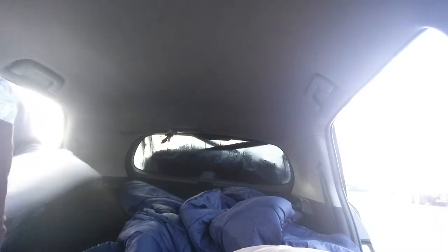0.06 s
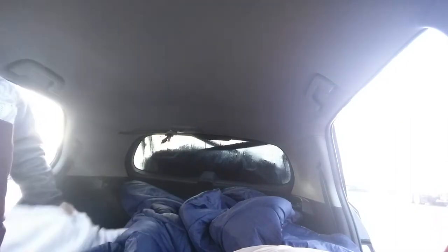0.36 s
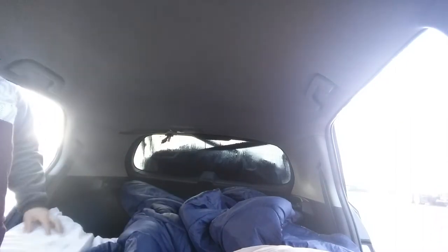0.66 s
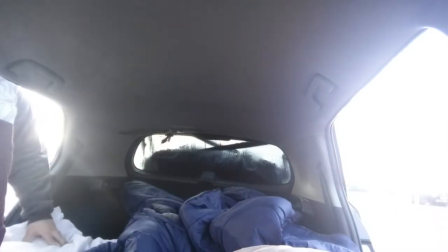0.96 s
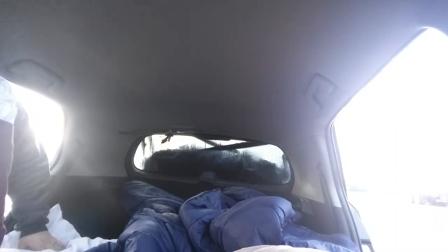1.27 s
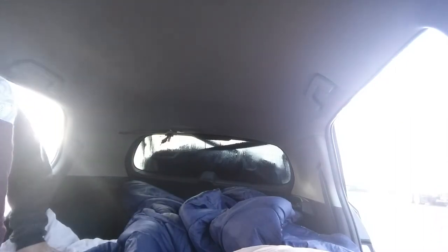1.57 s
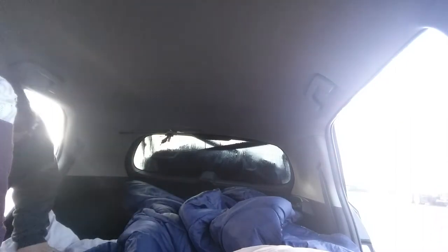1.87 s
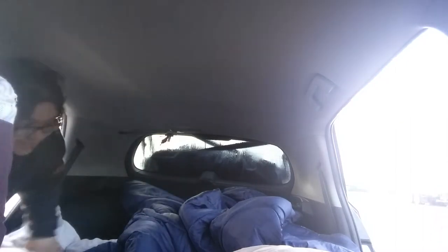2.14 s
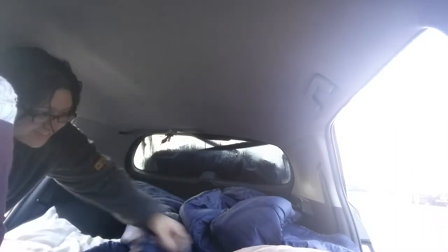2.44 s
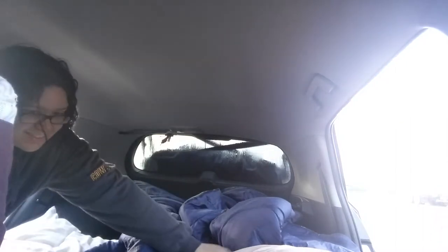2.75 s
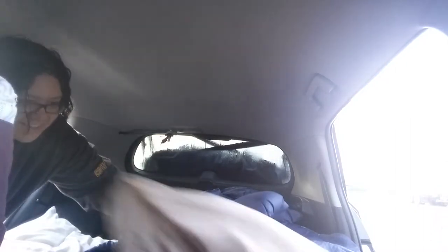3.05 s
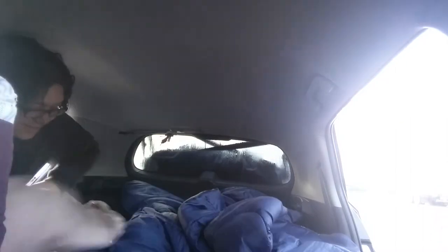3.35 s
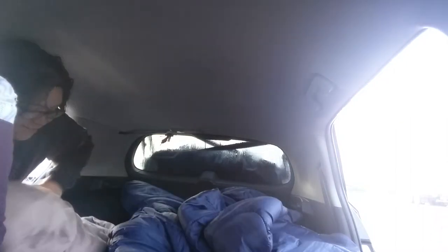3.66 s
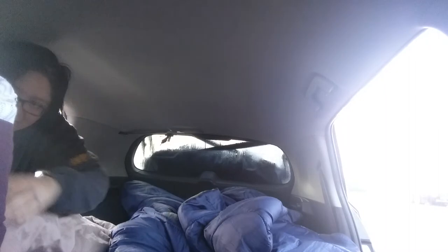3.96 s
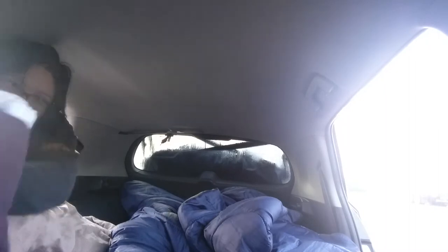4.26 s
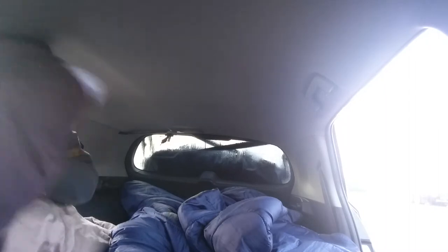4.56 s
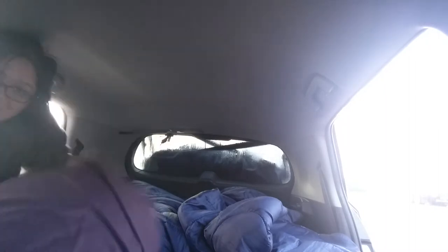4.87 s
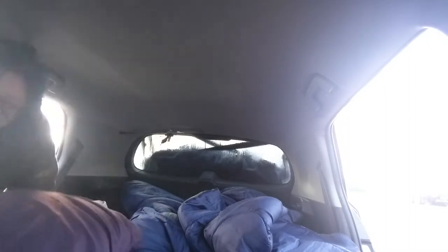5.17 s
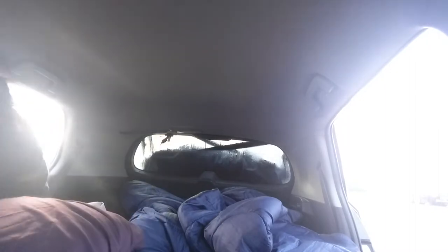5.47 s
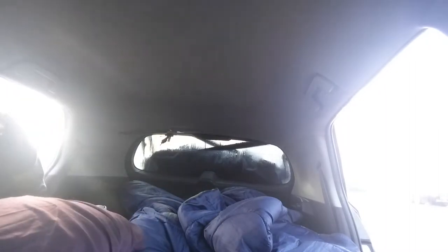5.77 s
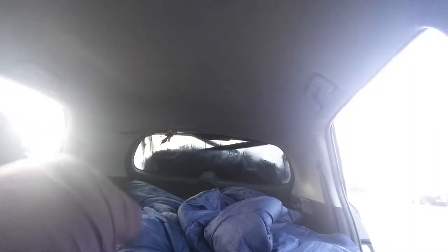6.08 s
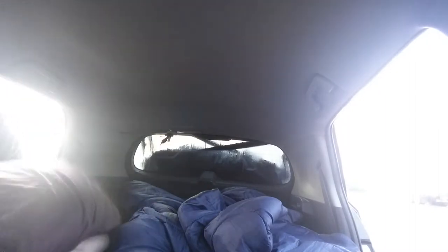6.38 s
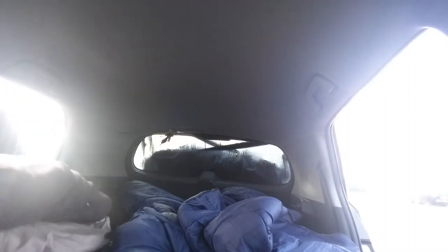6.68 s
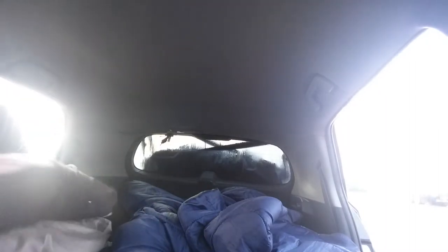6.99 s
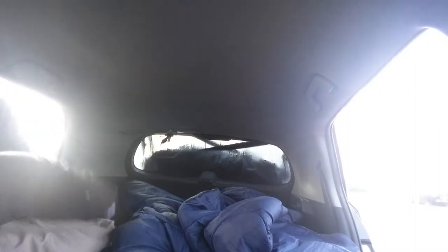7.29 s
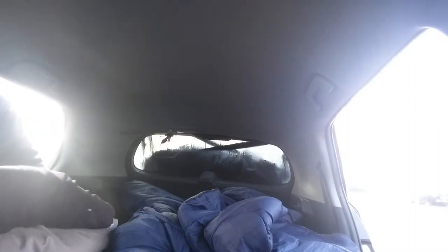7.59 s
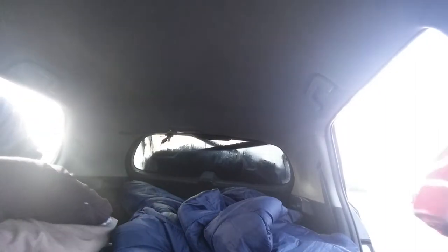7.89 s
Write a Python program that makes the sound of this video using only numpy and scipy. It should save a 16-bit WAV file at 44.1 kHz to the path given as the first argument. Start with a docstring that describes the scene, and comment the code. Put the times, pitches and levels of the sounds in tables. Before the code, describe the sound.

Inside a parked car, the engine idles with a steady low hum and rumble. Someone drags blankets with a dull rub and smooths them with a palm, their shifting weight booming softly on the floor. Nylon sleeping bags swish about three seconds in, then a blanket flops down with a thump. More scuffs, tiny crinkles and bumps follow, mostly to the left of the stereo microphone.

```python
"""A steady idling hum and rumble fill a parked car while bedding is pulled about in the back.
Blankets drag with a dull rub, a palm wipes over them, and shifting weight booms on the load floor.
Nylon sleeping bags swish, scuff and crinkle as they slide and buckle; one blanket flops down with a thump.
The hum is tones locked to the engine's turning; the cloth is friction noise coloured by the cabin.
Most of the movement is to the left of a two-port microphone."""
import sys
import numpy as np
from scipy import signal
from scipy.fft import rfft, irfft, next_fast_len
from scipy.io import wavfile

SR = 44100
rng = np.random.default_rng(int(sys.argv[2]) if len(sys.argv) > 2 else 0)


def dump(signal):
    """Clip the signal to [-1, 1] and save it as 16-bit WAV at the path in sys.argv[1]."""
    limited = np.clip(np.atleast_2d(signal).T, -1, 1)
    pcm = np.round(limited * 32767).astype(np.int16)
    wavfile.write(sys.argv[1], SR, pcm)


N = 354123
TIME = np.arange(N) / SR
SIZE = next_fast_len(N)
FREQS = np.maximum(np.fft.rfftfreq(SIZE, 1 / SR), 1)
PORT_LAG_S = 0.00058   # the right port hears later

# how much the sleeping bags stir: t/s, level/dB
BAG_STIR = [(0, -71), (1.1, -88), (2.05, -78.5), (2.85, -77.5), (3.4, -71), (4.15, -77.5), (4.55, -72),
            (4.95, -77), (6.2, -73), (6.8, -75), (7.03, -73.5), (7.65, -74.5), (8.03, -73.5)]
# colour of the cabin's boom: f/Hz, left/dB, right/dB
CABIN_BOOM = [(85.6, -2.5, -6), (116, -1.5, -2), (144, 1, 0.5), (202, -12, -10), (281, -19, -20)]


def from_db(db):
    """Decibels to gain."""
    return 10 ** (np.asarray(db) / 20)


def rms_one(x):
    """Scale to unit power."""
    return x / np.sqrt(np.mean(x ** 2) + 1e-20)


def in_time(rows):
    """A curve read at every sample."""
    return np.interp(TIME, *np.transpose(rows))


def over_pitch(rows):
    """Each level column of a table read at every frequency."""
    hz, *columns = np.transpose(rows)
    return np.array([np.interp(np.log(FREQS), np.log(hz), c) for c in columns])


def drift(rate_hz):
    """A slow random wobble of unit power."""
    spectrum = rfft(rng.standard_normal(SIZE)) / (1 + (FREQS / rate_hz) ** 2)
    return rms_one(irfft(spectrum, SIZE)[:N])


def stroke(peak_s, rise_s, fall_s):
    """The bell-shaped envelope of a movement that speeds up, then stops."""
    return np.exp(-.5 * ((TIME - peak_s) / np.where(TIME < peak_s, rise_s, fall_s)) ** 2)


def strokes(rows):
    """The envelope of a series of movements."""
    return sum(from_db(db) * stroke(s, rise, fall) for s, rise, fall, db in rows)


def effort(rows, rise_share, rest_db):
    """Overlapping movements add in power over a resting level; each builds for a share of its length."""
    power = sum((from_db(db) * stroke(s, rise_share * length, (1 - rise_share) * length)) ** 2
                for s, length, db in rows)
    return np.sqrt(from_db(rest_db) ** 2 + power)


def at_ports(drive, colour, skirt_db_per_octave=30):
    """Two noises become a coloured stereo field that rings in the cabin and reaches the left port first."""
    # diffuse sound that differs between the ports, against the shared sound: f/Hz, level/dB
    diffuse = [(30, -23), (90, -19), (180, -12.5), (260, -9), (520, -9), (800, -5.5), (1100, -7.5),
               (1600, 0), (3000, 0)]
    # air resonances of the cabin: f/Hz, width/Hz, gain/dB
    air_modes = [(318.6, 4.5, 4.5), (392, 5.5, 1.5), (457, 83, -6), (482, 29, 4), (930, 24, 0)]
    side_gain = from_db(over_pitch(diffuse)[0])
    mid, side = rfft(drive, SIZE)
    ports = (mid + side_gain * side * [[1], [-1]]) / np.hypot(1, side_gain)
    ports[1] *= np.exp(-2j * np.pi * FREQS * PORT_LAG_S)
    cabin_db = sum(db / (1 + (2 * (FREQS - hz) / width) ** 2) for hz, width, db in air_modes)
    # the colour rolls off beyond either end of its table
    octaves_beyond = np.abs(np.log2(FREQS / np.clip(FREQS, colour[0][0], colour[-1][0])))
    eq_db = over_pitch(colour) + cabin_db - skirt_db_per_octave * octaves_beyond
    return irfft(ports * from_db(eq_db), SIZE)[:, :N]


def steady(colour):
    """Even noise, coloured from a flat 0 dB per Hz."""
    return at_ports(rng.standard_normal((2, N)) * np.sqrt(SR / 2), colour)


def friction(colour, grains_per_s=700, spread_db=3, grain_db=-8):
    """Countless slipping fibres make smooth noise; larger slips are grains. Defaults suit soft cloth."""
    sizes = from_db(spread_db * np.minimum(rng.exponential(1, (2, N)), 5))
    signs = rng.choice([-1, 1], (2, N))
    slips = rng.random((2, N)) < grains_per_s / SR
    grains = from_db(grain_db) * rms_one(sizes * signs * slips)
    return rms_one(at_ports(rng.standard_normal((2, N)) + grains, colour))


def engine(turns_per_s=22.42, wander_turns=0.0028, flutter_db=1.0, pan_right_db=0.35):
    """Tones locked to the slightly uneven turning of the engine, over the rumble of the body shell."""
    # idle tones: multiple of the turning rate, level/dB
    orders = [(1, -63.5), (2, -54.5), (3, -44), (4, -31.5), (5, -47.5), (7, -46), (8, -54), (9, -53.5),
              (19, -59.5)]
    # noise spectrum of the rumble: f/Hz, left/dB, right/dB
    rumble = [(20.3, -70, -69), (37.6, -55.5, -49.5), (60.5, -62.5, -59.5), (80.3, -51.5, -46),
              (112, -58, -52), (165, -54, -57), (205, -67, -63), (297, -67.5, -69.5), (472, -71, -75.5),
              (660, -78, -80), (946, -80, -86), (1574, -97, -105), (2230, -109, -113)]
    port_time = TIME - np.array([[0], [PORT_LAG_S]])
    turns = turns_per_s * port_time + wander_turns * drift(rate_hz=1.1)
    # the tones line up once a turn, so the hum throbs
    hum = sum(np.sqrt(2) * from_db(db) * np.sin(2 * np.pi * order * turns) for order, db in orders)
    balance_db = pan_right_db * np.array([[-.5], [.5]])
    return steady(rumble) + hum * from_db(balance_db - flutter_db * drift(rate_hz=8))


def hiss():
    """A faint, steady bed of treble noise."""
    # noise spectrum: f/Hz, left/dB, right/dB
    colour = [(2390, -113, -113), (3704, -116, -119), (5500, -120, -128), (7250, -131, -132),
              (10100, -129, -127), (11700, -120, -118), (14500, -116, -114), (15500, -111, -109)]
    return steady(colour)


def blanket_drags(catch_db=0.5):
    """Soft cloth rubs and catches as it is dragged, and keeps brushing in between."""
    # drags: peak t/s, length/s, level/dB
    drags = [(.3, 0.18, -46), (.87, 0.55, -48), (1.46, 0.23, -39.5), (1.95, 0.62, -44), (2.85, 0.71, -49),
             (4.35, 0.29, -44.5), (5.09, 0.32, -42.5), (5.83, .15, -47.5), (6.5, 0.62, -46),
             (6.95, 0.3, -46)]
    # the dull rub of a blanket: f/Hz, left/dB, right/dB
    colour = [(187, -8, -7.5), (240, 1, -1), (330, 9, 8.5), (396, -0.5, 1), (570, -1.5, -5),
              (780, -10, -13), (1110, -14, -21.5), (1600, -32.5, -32.5), (2590, -42.5, -49),
              (5000, -51, -57.5)]
    rub = friction(colour) * effort(drags, rise_share=.45, rest_db=-58)
    return rub * from_db(catch_db * drift(rate_hz=26))


def weight_shifts():
    """Weight bearing on the load floor booms in the cabin, with small movements in between."""
    # leans: peak t/s, length/s, level/dB
    leans = [(1.04, 0.14, -39.5), (1.5, 0.13, -38), (1.77, 0.28, -33.5), (2.2, 0.1, -33.5),
             (3.15, 0.094, -31.5), (3.51, 0.17, -34), (4.27, 0.23, -34.5), (5.05, 0.69, -35.5),
             (5.46, 0.18, -33), (5.78, 0.13, -31.5), (6.08, 0.25, -33.5), (6.62, 0.44, -34.5),
             (7.0, 0.12, -28), (7.41, 0.092, -33.5)]
    return rms_one(steady(CABIN_BOOM)) * effort(leans, rise_share=0.48, rest_db=-44.5)


def padding_rustle(crinkles_per_s):
    """The padded bags rustle as they crease."""
    # colour of the padding: f/Hz, left/dB, right/dB
    colour = [(1290, 12, 1.5), (1910, 5, 5), (2260, 7.5, -1.5), (2640, -2, -4), (2870, 2, -6.5),
              (3500, -5.5, -10), (4250, -0.5, -13), (4600, -4.5, -15.5), (5300, -4, -22), (6200, -12, -20),
              (9000, -21, -22.5)]
    return friction(colour, crinkles_per_s, grain_db=-7) * from_db(in_time(BAG_STIR))


def nylon_swishes(crinkles_per_s, sheen_hz=12000, rise_share=0.34):
    """Nylon pulled over nylon rasps; the tauter it is, the more sheen lies on top."""
    # pulls: peak t/s, length/s, level/dB, extra sheen/dB
    pulls = [(0.303, 0.19, -74.5, -8), (1.55, 0.11, -83, 7.5), (1.999, .22, -77, 5),
             (2.515, 0.09, -70.5, 2.5), (2.838, 0.15, -73.5, 2), (3.123, 0.18, -58.5, -1.5),
             (3.292, 0.15, -59.5, -1.5), (3.56, 0.2, -70.5, -1.5), (3.884, 0.24, -66.5, -3.5),
             (3.995, 0.059, -64, 8), (4.35, 0.39, -77, 5.5), (4.982, 0.23, -70, 2.5),
             (5.8, .06, -83.5, 4.5), (5.992, .06, -73.5, 7), (6.193, 0.2, -68, 2.5),
             (6.72, 0.056, -71.5, 4.5), (6.994, 0.13, -77, 4), (7.481, .12, -68, 4),
             (7.815, 0.28, -76, 5.5)]
    # colour of sliding nylon: f/Hz, left/dB, right/dB
    colour = [(1500, -5, -5), (3000, -5.5, -15), (5000, -6, -23), (6100, -5, -22), (7940, -13, -24.5),
              (9170, -1, -18), (9250, -1.5, -13), (11100, -10.5, -12.5), (13200, -1.5, -6),
              (15300, 0.5, 8.5)]
    nylon = friction(colour, crinkles_per_s, grain_db=-7)
    sheen = irfft(rfft(nylon, SIZE) / (1 + (sheen_hz / FREQS) ** 20), SIZE)[:, :N]   # steep high-pass
    rest_db = in_time(BAG_STIR) - 5   # between pulls the nylon stirs just under the padding
    rasp_gain = effort([(s, length, db) for s, length, db, _ in pulls], rise_share, rest_db)
    sheen_gain = effort([(s, length, db + extra) for s, length, db, extra in pulls], rise_share, rest_db)
    return rasp_gain * (nylon - sheen) + sheen_gain * sheen


def sleeping_bags(gain_db=2.0, catch_db=1.5, clump_db=7.9):
    """Stiff nylon buckles in clumps of crinkles; shell and padding catch and slide together."""
    crinkles_per_s = 220 * from_db(clump_db * drift(rate_hz=5))
    level = from_db(gain_db + catch_db * drift(rate_hz=16))
    return level * (padding_rustle(crinkles_per_s) + nylon_swishes(crinkles_per_s))


def creases(right_db=-7):
    """A buckling crease gives a tiny tick around one pitch; a narrow, longer one squeaks."""
    # snaps and squeaks: t/s, f/Hz, width/Hz, decay/s, left peak level/dB
    snaps = [(.385, 8460, 600, .005, -69.5), (0.613, 8600, 400, 0.0083, -73),
             (2.028, 4500, 1980, .002, -63), (3.593, 11800, 3000, 0.0019, -56),
             (4.2, 11000, 2800, 0.0029, -57.5), (4.319, 8550, 1200, 0.012, -65),
             (4.56, 2900, 250, 0.027, -66), (4.975, 7500, 3000, 0.0025, -68),
             (4.992, 13300, 350, 0.0071, -64), (5.04, 5600, 297, 0.01, -63), (5.046, 13300, 400, .007, -56),
             (5.117, 10000, 3000, .003, -65), (6.986, 4900, 300, 0.027, -66),
             (7.448, 5200, 2000, .018, -59)]
    ticks = np.zeros(N)
    age = TIME[:SR // 16]
    for s, hz, width_hz, decay_s, db in snaps:
        burst = rng.standard_normal(len(age)) * np.exp(-age / decay_s)
        radius = np.exp(-np.pi * width_hz / SR)
        resonator = [1, -2 * radius * np.cos(2 * np.pi * hz / SR), radius ** 2]
        tick = signal.lfilter([1, 0, -1], resonator, burst)
        start = int(s * SR)
        ticks[start:start + len(age)] += from_db(db) * tick / np.abs(tick).max()
    return ticks * from_db([[0], [right_db]])


def palm_wipes():
    """A palm smooths the blanket with a soft midrange rub."""
    # wipes: peak t/s, rise/s, fall/s, level/dB
    wipes = [(1.57, 0.091, 0.15, -44), (4.29, 0.12, 0.25, -48), (5.1, .06, .1, -60)]
    # colour of a palm on cloth: f/Hz, left/dB, right/dB
    colour = [(320, 2, -4), (420, -6, -6.5), (526, 8, 7), (584, 3, -6), (730, -13.5, -15), (990, 1, -6),
              (1340, -23, -24.5), (2060, -40, -46)]
    return friction(colour) * strokes(wipes)


def nylon_scuffs():
    """Quick tugs make the fabric slip in short, bright, grainy bursts."""
    # tugs: peak t/s, rise/s, fall/s, level/dB
    tugs = [(2.532, 0.016, .0098, -70.5), (2.83, .015, .016, -77), (3.957, 0.013, .008, -63),
            (4.003, .018, 0.0092, -55.5), (4.022, .005, .004, -61), (4.325, .0092, .012, -75),
            (6.165, .015, .025, -75.5), (7.456, .008, 0.01, -71)]
    # colour of a scuff: f/Hz, left/dB, right/dB
    colour = [(3000, -16.5, -20.5), (5500, -2, -28), (7800, -6, -24), (10200, 6, -12), (12500, -2, -7.5),
              (15500, -0.5, 1.5)]
    return friction(colour, grains_per_s=1300, spread_db=2, grain_db=0) * strokes(tugs)


def blanket_flop(thump_fall_s=0.07):
    """The cloth slaps down and the air it pushes thumps in the cabin a little longer."""
    # the landing: peak t/s, rise/s, slap fall/s, slap level/dB, thump level/dB
    landings = [(3.441, 0.0092, 0.023, -28.5, -30)]
    # colour of the slap: f/Hz, left/dB, right/dB
    colour = [(150, 12, 14.5), (223, 16.5, 18), (350, 4, 2), (450, -4, -11), (557, -0.5, -4.5),
              (664, 2.5, 2), (806, 3.5, -6), (1080, -16, -6.5), (1710, -19.5, -36), (2390, -23, -35),
              (3070, -38, -41), (7000, -38, -60)]
    slap_gain = strokes([(s, rise, fall, db) for s, rise, fall, db, _ in landings])
    thump_gain = strokes([(s, rise, thump_fall_s, db) for s, rise, _, _, db in landings])
    return slap_gain * friction(colour) + thump_gain * rms_one(steady(CABIN_BOOM))


def scene():
    """The bedding moves over a bed of engine and hiss."""
    background = engine() + hiss()
    handling = blanket_drags() + weight_shifts() + sleeping_bags()
    accents = creases() + palm_wipes() + nylon_scuffs() + blanket_flop()
    return background + handling + accents


def record(dry, cutoff_hz=15800, fade_s=.004):
    """The sound opens without a click; the top is cut steeply."""
    low_pass = signal.ellip(12, .1, 90, cutoff_hz, fs=SR, output="sos")
    fade_in = np.sin(np.pi / 2 * np.minimum(TIME / fade_s, 1))
    return signal.sosfilt(low_pass, dry * fade_in)


dry = scene()
out = record(dry)
dump(out)
```